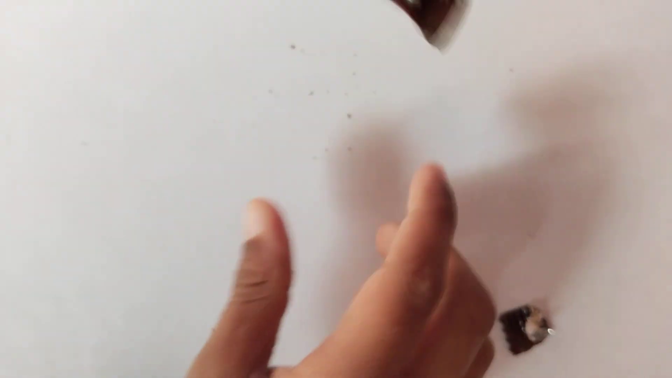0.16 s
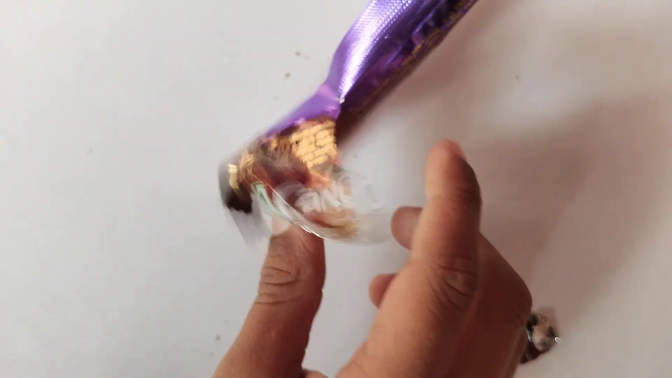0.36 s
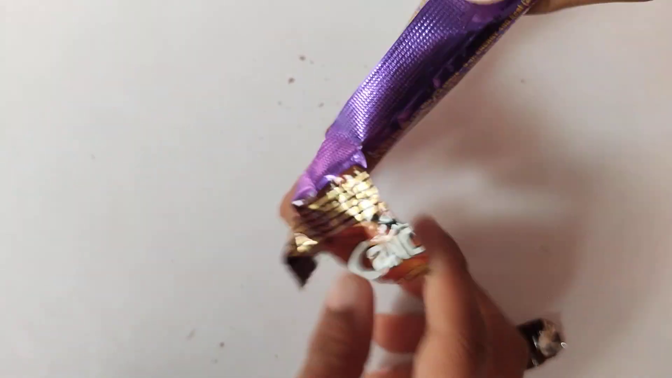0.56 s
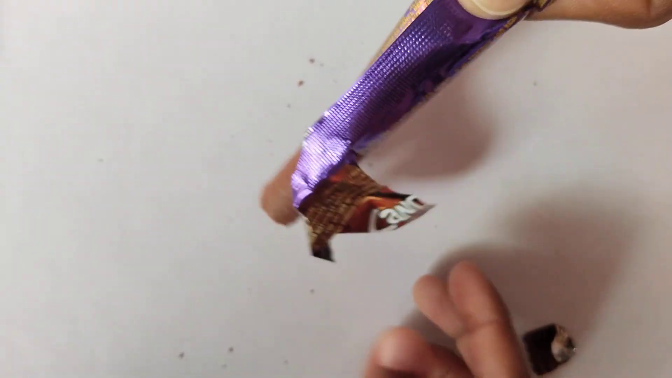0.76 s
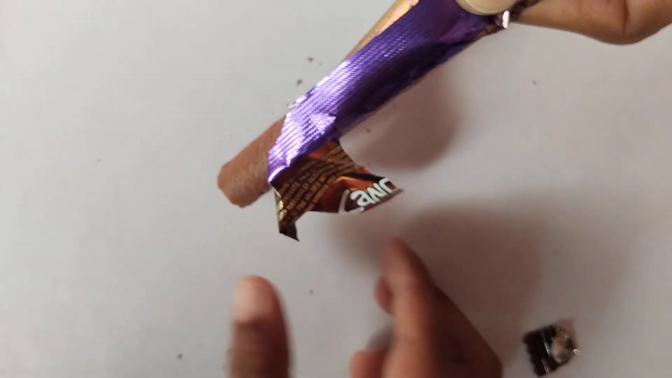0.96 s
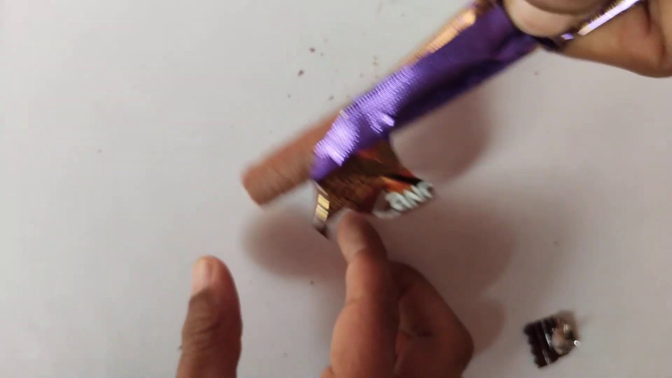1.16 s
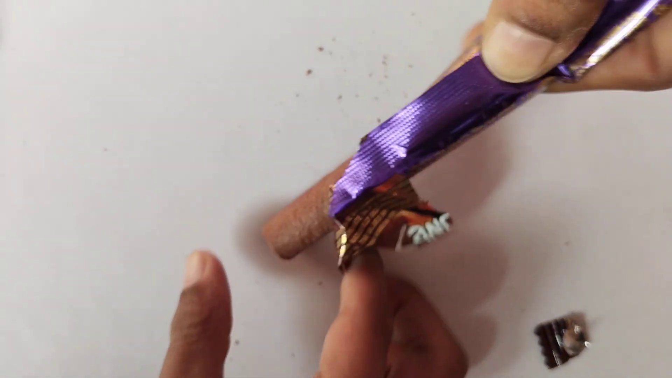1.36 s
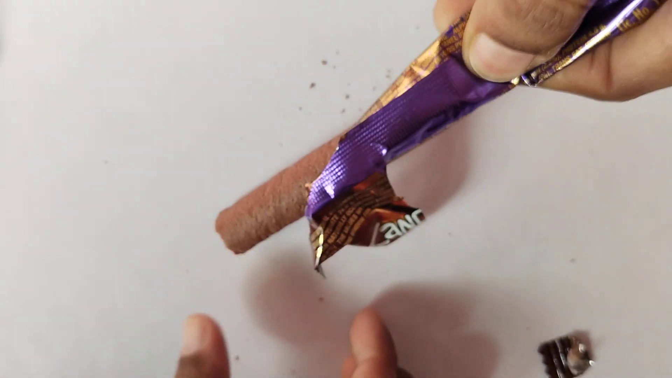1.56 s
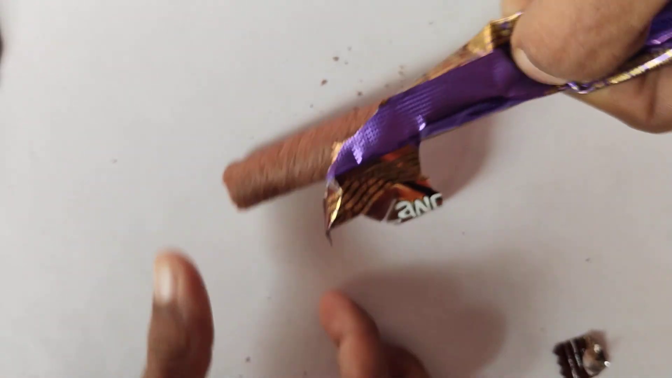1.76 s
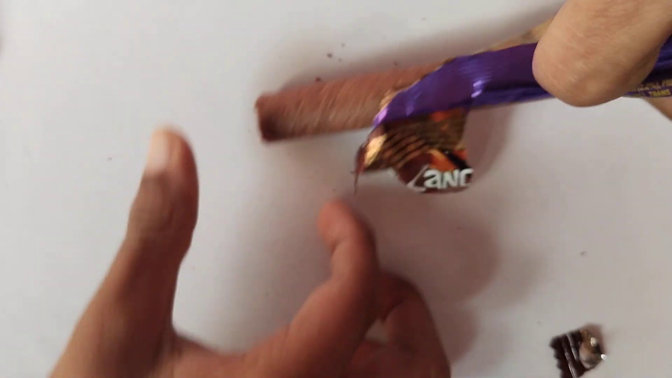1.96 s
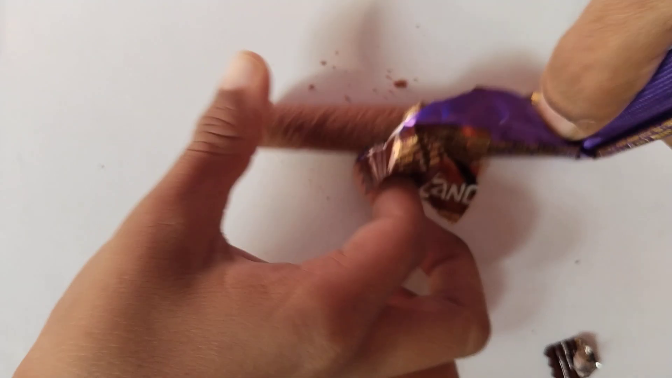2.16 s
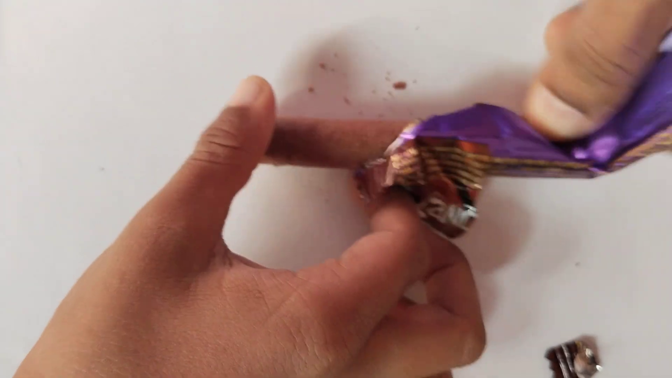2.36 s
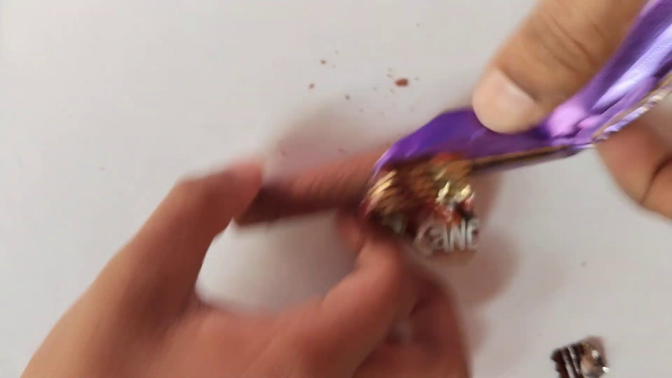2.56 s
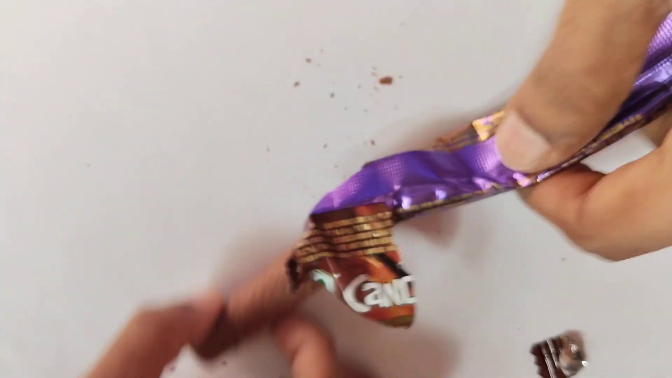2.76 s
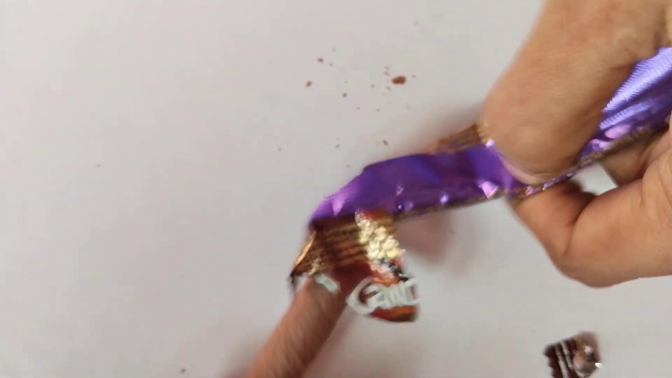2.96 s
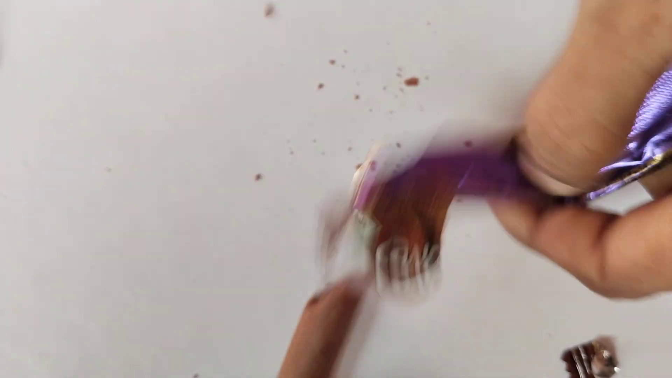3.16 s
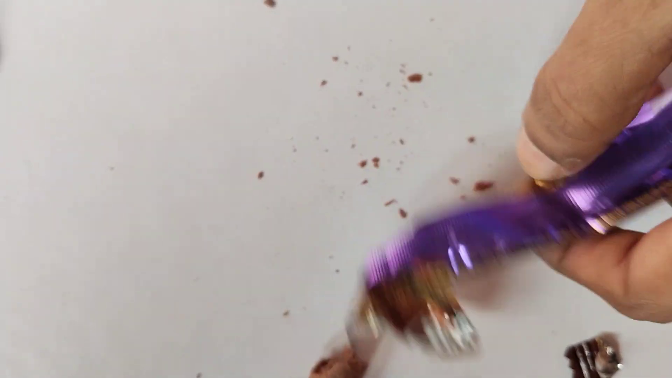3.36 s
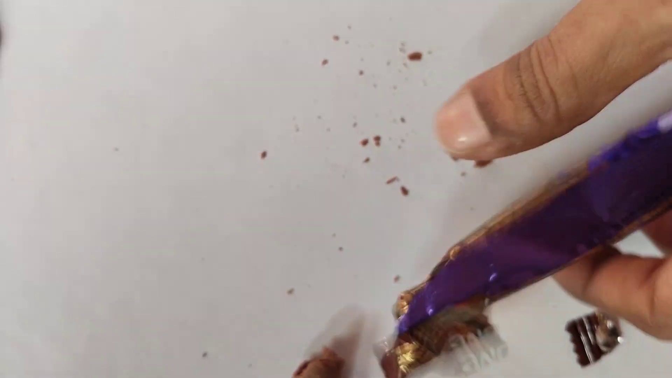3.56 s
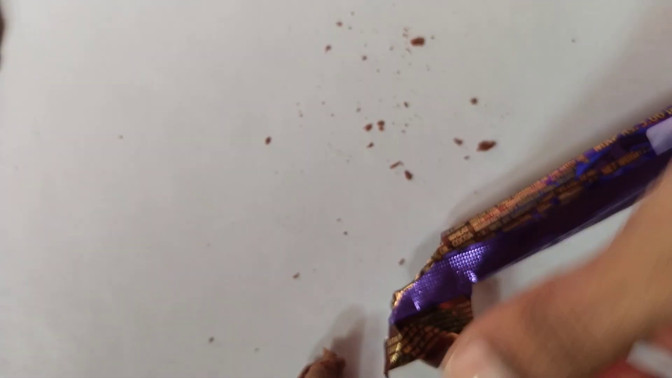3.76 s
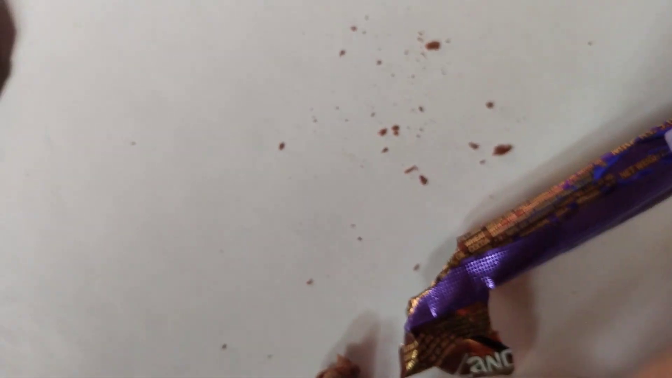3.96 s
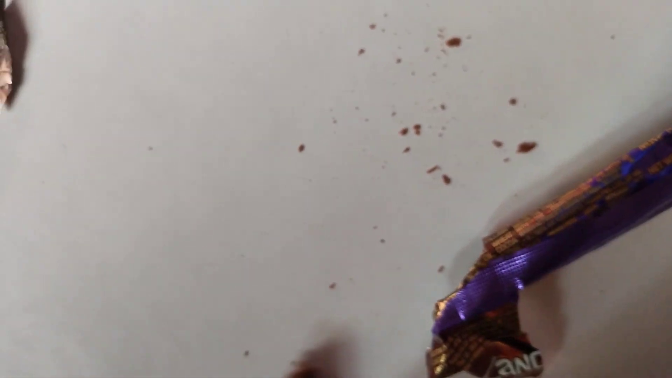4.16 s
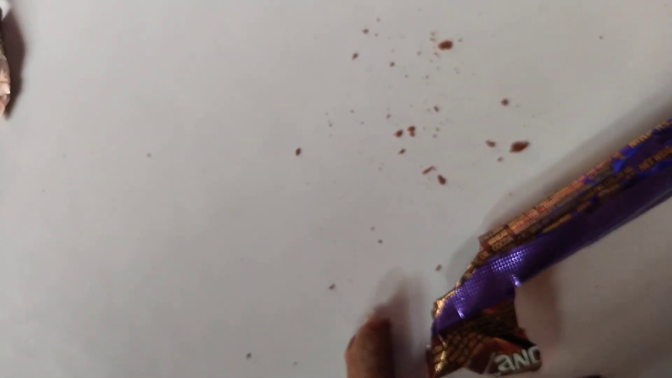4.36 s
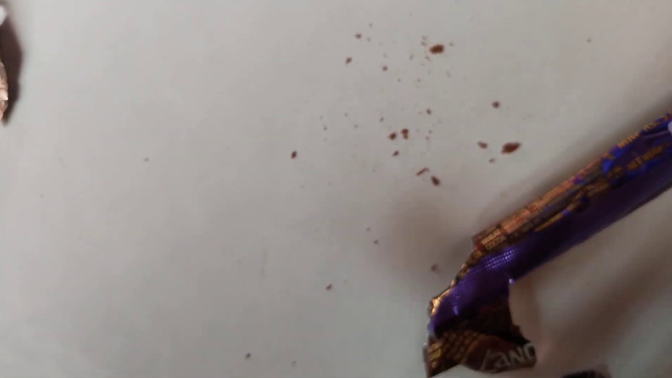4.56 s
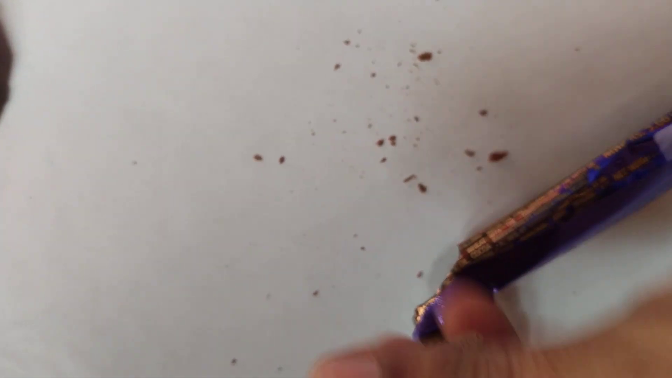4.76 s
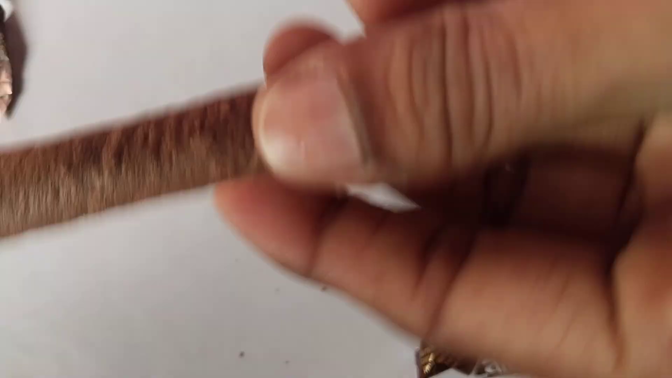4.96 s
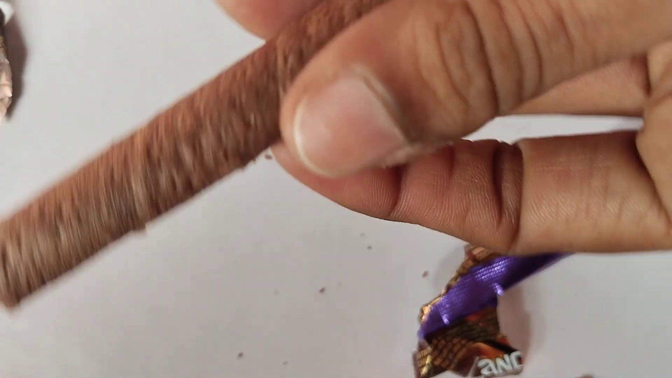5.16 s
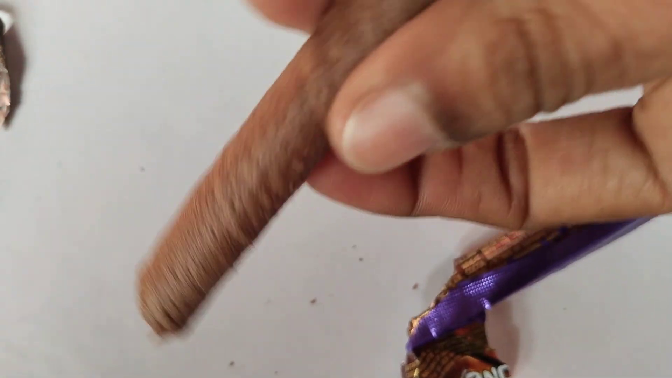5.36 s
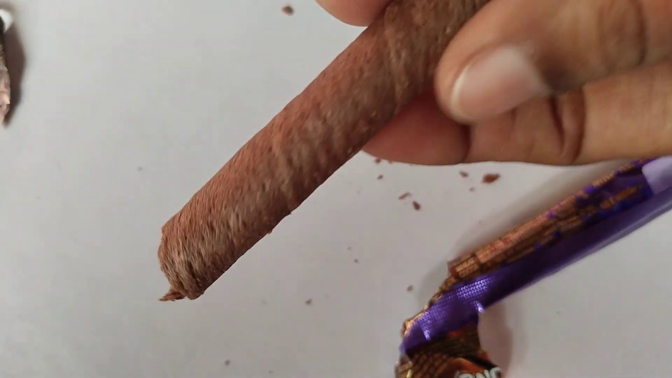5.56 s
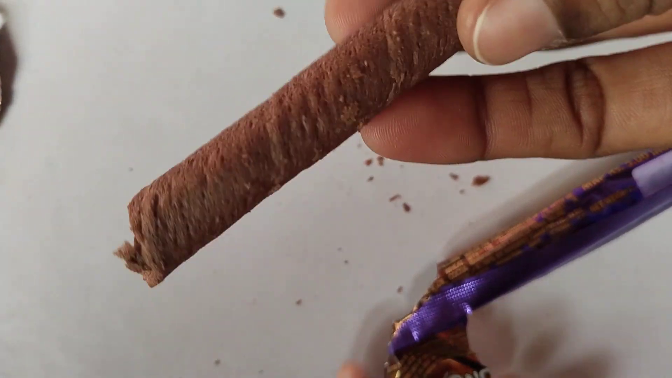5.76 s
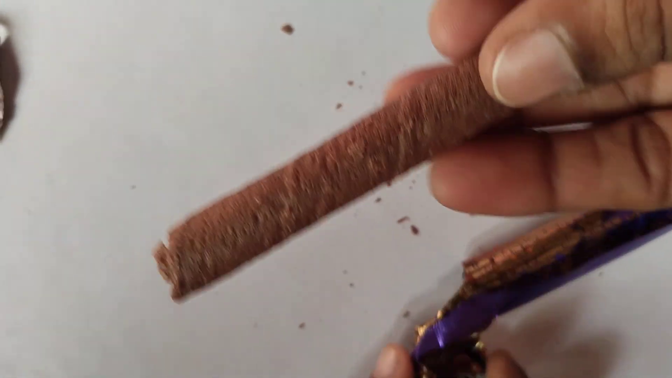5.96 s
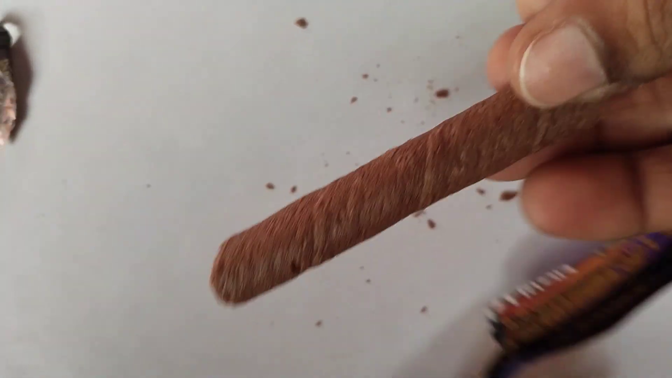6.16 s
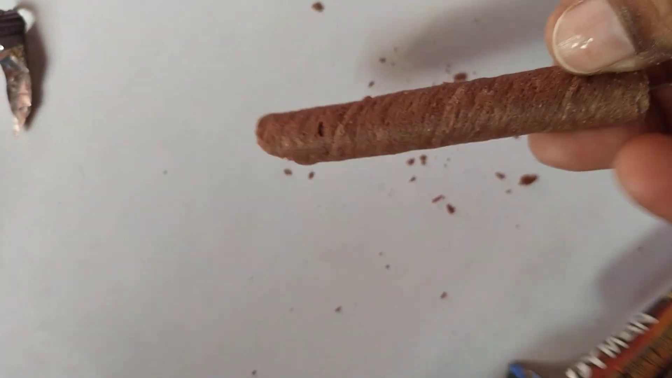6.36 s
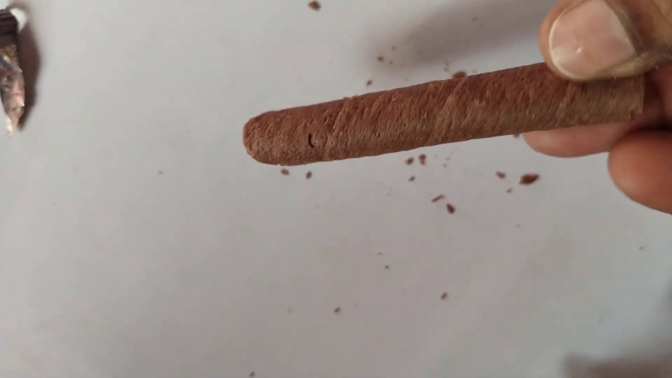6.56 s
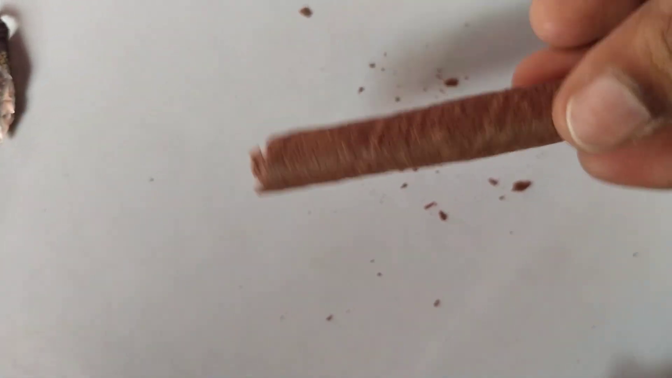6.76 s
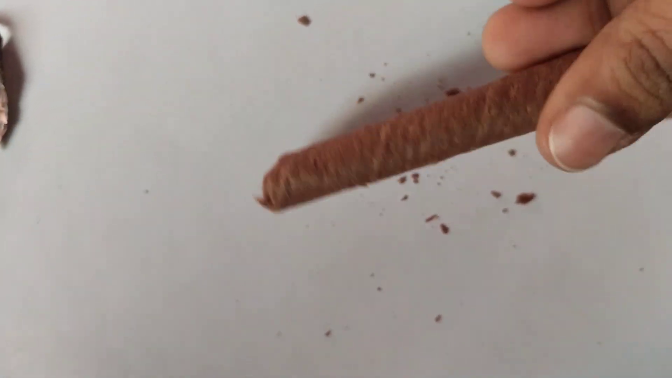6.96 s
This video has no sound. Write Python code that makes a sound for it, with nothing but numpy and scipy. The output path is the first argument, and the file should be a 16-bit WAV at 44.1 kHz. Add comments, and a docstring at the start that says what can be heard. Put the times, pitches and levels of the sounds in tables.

```python
"""Foil creases snap one by one over a rustle of tiny buckles as a wrapper is peeled off a wafer roll.
Each buckle is a short noise burst filtered by the foil; friction is noise shaped by hand gestures.
Knocks and rubbing excite decaying modes of the table top, and a small room answers, close to a phone.
After a pause with faint scuffs and squeaks the wrapper is pushed aside, with one last loud snap.
Outside, filtered noise rumbles as traffic, and two sine orders of a motor enter near the end."""
import sys
import numpy as np
from scipy import signal
from scipy.fft import rfft, irfft, next_fast_len
from scipy.io import wavfile

SR = 44100
rng = np.random.default_rng(int(sys.argv[2]) if len(sys.argv) > 2 else 0)


def put_to_file(sound):
    """Save the sound as 16-bit audio at rate SR, in the file named by the first command-line argument."""
    columns = np.atleast_2d(sound).T  # one column per channel
    safe = np.clip(columns, -1, 1)
    whole_steps = np.round(safe * 32767)
    wavfile.write(sys.argv[1], SR, whole_steps.astype(np.int16))


N = 312669
T = np.arange(N) / SR

# Levels in the tables are relative: later gains, random flicker, filters and the room act on them.

# traffic rumble over time: start_s, level_db; and its spectrum: frequency_hz, level_db
TRAFFIC_LEVEL = [(0, -63.5), (4.0, -60.5), (4.7, -54.5), (6.0, -56.5), (6.5, -59.5)]
TRAFFIC_SPECTRUM = [(20, -17.5), (45, 0.5), (70, 2.5), (95, -5), (140, -1.5), (350, -9), (520, -23),
                    (3000, -34.5), (5500, -45.5), (15500, -42)]
# lower order of the motor outside: start_s, pitch_hz, level_db
MOTOR_COURSE = [(6.45, 127.8, -78), (6.84, 129.2, -49.5), (7.0, 151.7, -56), (7.09, 160, -57.5)]

# faint hollow scuffs: start_s, length_s, level_db; their resonances: centre_hz, half_width_hz, level_db
SCUFF_MOVES = [(4.13, 0.39, -66.5), (4.285, 0.037, -54.5), (4.372, 0.019, -55), (4.45, 0.057, -60.5)]
SCUFF_RESONANCES = [(714, 79, -4), (1222, 70, -3), (1450, 90, -7)]
# faint high squeaks: start_s, length_s, level_db; their resonances: centre_hz, half_width_hz, level_db
SQUEAK_MOVES = [(3.93, 0.014, -58), (4.925, 0.029, -60.5), (6.927, 0.011, -52.5)]
SQUEAK_RESONANCES = [(3100, 220, 2), (3500, 650, -7)]
# faint, airy high rustles: start_s, length_s, level_db; their band: centre_hz, half_width_hz, level_db
AIRY_RUSTLES = [(4.38, 0.18, -66.5), (4.86, 0.11, -68), (5.315, 0.05, -72), (5.578, 0.015, -67),
                (6.69, 0.1, -75.5)]
AIRY_RUSTLE_BAND = [(10400, 4000, 0)]
# thin, slowly fading whistle: start_s, length_s, level_db; its pitch: centre_hz, half_width_hz, level_db
WHISTLE_MOVES = [(4.15, 0.27, -74.5)]
WHISTLE_RESONANCES = [(3353, 22, 0)]

# modes of the table top: frequency_hz, level_db, t60_s
TABLE_MODES = [(163, -15.5, 0.094), (345, -8, 0.096), (732.3, 6, 0.057), (1060, -7, 0.07), (1200, -2, 0.05),
               (1470, -4.5, 0.011), (2680, 1.5, 0.07)]
# hand landing on the table, and at 0.103 s a brief squeak that sets the board ringing: start_s, level_db,
# contact_ms (the push peaks after a quarter of it)
HAND_KNOCKS = [(0.103, -32.5, 0.56), (0.46, -13, 0.59), (1.381, -16.5, 7.6), (4.379, -25.5, 3.2),
               (4.393, -18.5, 5.9), (6.367, -19, 7.9)]
# strokes of hand and wafer over the table: start_s, length_s, level_db
TABLE_STROKES = [(0.016, 0.012, -45), (0.455, 0.005, -45), (0.848, 0.012, -56), (0.93, 0.012, -61),
                 (1.2, 0.12, -56.5), (1.49, 0.09, -55.5), (1.87, 0.12, -52.5), (2.08, 0.01, -43),
                 (2.185, 0.1, -42.5), (2.62, 0.19, -46), (2.91, 0.24, -46), (3.22, 0.099, -47),
                 (3.56, 0.18, -55.5), (4.45, 0.042, -56.5)]
# the resting hand shifts lightly while the wafer is drawn out: start_s, length_s, level_db
RESTING_HAND = (1.1, 2.6, -65)
# centre of the rubbing note, which dips and recovers: start_s, pitch_hz
RUBBING_PITCH = [(2.1, 745.4), (2.2, 702), (2.4, 732.5), (2.6, 707), (2.7, 656.6), (2.92, 737.4)]

# emptied wrapper pushed over the table: start_s, length_s, level_db
WRAPPER_PUSHES = [(3.655, 0.082, -42.5), (3.83, 0.02, -56), (5.935, 0.027, -47.5), (5.98, 0.058, -53.5),
                  (6.168, 0.0051, -51), (6.3, 0.12, -52)]
# resonances of the empty sleeve: centre_hz, width_hz, boost_db
SLEEVE_RESONANCES = [(2360, 750, 13), (3110, 240, 6.5), (3480, 180, 7.5), (4170, 360, 11.5), (7000, 540, 7)]
# fingers squeeze or pull the foil: start_s, length_s, level_db
FOIL_GRIPS = [(0.13, 0.044, -41), (0.175, 0.076, -38), (0.385, 0.089, -44.5), (0.55, 0.19, -51.5),
              (1.02, 0.31, -49), (1.225, 0.061, -38), (1.31, 0.078, -42.5), (1.9, 0.13, -50),
              (2.035, 0.066, -36.5), (2.17, 0.11, -38), (2.25, 0.06, -31), (2.6, 0.084, -50),
              (2.84, 0.056, -44), (2.9, 0.065, -32.5), (3.09, 0.018, -35.5), (3.655, 0.16, -57.5),
              (6.29, 0.064, -56.5)]
# the held wrapper stirs between grips: start_s, length_s, level_db
HELD_WRAPPER = (0, 3.76, -55)
# radiation spectrum of the foil: frequency_hz, level_db
FOIL_SPECTRUM = [(100, -26), (400, -21), (900, -9), (1800, -6), (2700, -2), (4200, 1.5), (5200, -1.5),
                 (6100, -5.5), (7200, -3.5), (9500, -1.5), (12500, -2.5), (15500, -6.5)]
# single snaps and ticks, loud and faint: start_s, peak_db, facet_ring_hz,
# body_db (below 2.6 kHz, relative to the peak), left_minus_right_db
CREASE_SNAPS = [(0.0034, -17, 9600, -30, 2), (0.0094, -15.5, 9850, -30, 2), (0.0366, -14.5, 8700, -13, -4),
                (0.1433, -19, 10400, -39.5, 7), (0.159, -18.5, 11450, -30, 4),
                (0.1803, -11, 4000, -32, 0.5), (0.2002, -16, 14220, -29, -8),
                (0.2352, -17, 3880, -13.5, -3), (0.255, -15.5, 11200, -30, 4.5),
                (0.263, -13.5, 14500, -28.5, 0), (0.351, -18.5, 3860, -14.5, 4),
                (0.439, -23, 10880, -19, 3.5), (0.4597, -10, 1304, -15, 0),
                (0.5782, -15.5, 11600, -61.5, -2), (0.6413, -22, 2530, -17.5, 4.5),
                (0.7006, -22, 10430, -23.5, 3), (0.8203, -20.5, 13100, -56, -1),
                (0.874, -20, 12500, -25, -1), (1.0394, -17, 11800, -27.5, -2),
                (1.082, -22.5, 11900, -37.5, 5.5), (1.149, -24, 2740, -13, 3.5),
                (1.2301, -12, 4272, -41.5, 8), (1.2448, -16, 9760, -36, 2),
                (1.26, -15.5, 9190, -42.5, -5.5), (1.3618, -13.5, 4270, -34, -2),
                (1.372, -16.5, 11720, -28, 3), (1.3814, -11, 11860, -23.5, 1),
                (1.5193, -15.5, 11200, -37.5, 3.5), (1.5273, -15.5, 9840, -33, 4),
                (1.5342, -21.5, 8840, -20.5, 0.5), (1.5563, -18, 9300, -47, 12),
                (1.5634, -17, 13000, -34, 2), (1.5669, -18, 13600, -25, 1.5),
                (1.7638, -23, 1290, -12, -2.5), (1.8975, -19, 9900, -28, 4), (1.9897, -20, 1493, -15.5, 5),
                (2.01, -18.5, 10000, -14, 3), (2.0733, -18.5, 9000, -30, 0.5),
                (2.0984, -10, 4400, -31.5, 6), (2.223, -19, 12850, -25.5, -3.5),
                (2.2515, -8.5, 4680, -21.5, -3), (2.2917, -16.5, 4940, -31, 3),
                (2.309, -12, 6880, -30.5, 2), (2.3176, -16.5, 4630, -29.5, 0), (2.3224, -14, 3445, -25, 0),
                (2.353, -17, 8720, -21, -2.5), (2.419, -14, 4220, -23, 4.5), (2.461, -17, 3460, -18, 1.5),
                (2.5082, -19.5, 9930, -24, 2), (2.5161, -10, 13000, -27.5, 5),
                (2.5675, -17.5, 7280, -30, 7.5), (2.7383, -19, 2600, -12.5, 4.5),
                (2.893, -20, 4200, -11, 5), (2.9042, -9.5, 3660, -23.5, 3.5), (2.974, -16, 5570, -46, 4),
                (3.0869, -11.5, 9100, -28.5, 2.5), (3.0984, -7.5, 4330, -27, 1.5),
                (3.13, -20, 4395, -19, -5), (3.181, -19.5, 4160, -20.5, -7),
                (3.2615, -20.5, 5550, -16.5, -6), (3.3545, -18.5, 10900, -21, 3),
                (3.4526, -16.5, 3975, -15.5, 3), (3.657, -13.5, 3700, -23, 0), (3.7337, -18, 3430, -26, 2),
                (4.3, -37, 3930, -2, 0), (5.853, -49.5, 1100, -5, 10), (6.003, -32.5, 3930, -17, 3),
                (6.3654, -12.5, 7000, -24, 2)]

# time constants in s of the gesture envelopes; gripped foil gives at once and settles more slowly
GRIP_ATTACK_S, GRIP_RELEASE_S = 0.0051, 0.035
STROKE_ATTACK_S, STROKE_RELEASE_S = 0.012, 0.025
PUSH_ATTACK_S, PUSH_RELEASE_S = 0.0091, 0.024
# the crackle comes in bunches: spread in dB, random levels per second
BUNCH_DB, BUNCHES_PER_S = 3, 90
LEAD_S = 0.006  # room for a facet to stir before it flips
ROOM_T60_S, ROOM_TREBLE_T60_S, ROOM_BUILD_S = 0.4, 0.27, 0.0055
TOP_HZ = 15900  # upper limit of the phone


def undb(db):
    """Convert a level in decibels to an amplitude ratio."""
    return 10 ** (np.asarray(db) / 20)


def curve(rows, column=1):
    """Interpolate a table column linearly in time."""
    rows = np.array(rows)
    return np.interp(T, rows[:, 0], rows[:, column])


def unit(x):
    """Normalize to a root-mean-square value of 1."""
    return x / np.sqrt(np.mean(x ** 2))


def panned(db):
    """Power-preserving left and right gains for a level difference in dB."""
    return unit(undb(np.array([[db], [-db]]) / 2))


def colour(points, hz):
    """Interpolate a spectrum in dB on a logarithmic frequency axis."""
    f, db = np.transpose(points)
    return np.interp(np.log(hz + 1), np.log(f), db)


def shaped(x, db_at):
    """Linear filtering: multiply the spectrum by a gain in dB given as a function of frequency."""
    size = next_fast_len(x.shape[-1])
    gain = undb(db_at(np.fft.rfftfreq(size, 1 / SR)))
    return irfft(rfft(x, size) * gain, size)[..., :x.shape[-1]]


def causal(db):
    """Minimum phase: fold the cepstrum of a dB spectrum (last axis) so that it rings only after the blow."""
    cepstrum = irfft(db * np.log(10) / 20)
    half = cepstrum.shape[-1] // 2
    cepstrum[..., 1:half] *= 2
    cepstrum[..., half + 1:] = 0
    return np.exp(rfft(cepstrum))


def walk(rate):
    """Slow random fluctuation: Gaussian values at the given rate in Hz, joined by lines, spread near 1."""
    knots = rng.standard_normal(int(N / SR * rate) + 2)
    return 1.28 * np.interp(T * rate, np.arange(len(knots)), knots)


def add(out, s, sound):
    """Superposition: mix a sound in from time s, in seconds."""
    start = int(s * SR)
    a, b = max(start, 0), min(start + sound.shape[-1], N)
    if b > a:
        out[..., a:b] += sound[..., a - start:b - start]


def gestures(rows, attack_s, release_s):
    """Exponential envelope: each move swells, holds and dies away; the strongest one leads."""
    gain = np.full(N, 1e-6)
    for start, length, db in rows:
        before = np.maximum(start - T, 0) / attack_s
        after = np.maximum(T - start - length, 0) / release_s
        gain = np.maximum(gain, undb(db) * np.exp(-np.minimum(before + after, 20)))
    return gain


def outside(upper_ratio=1.175, upper_db=-2, side_db=-7):
    """Filtered noise and beating: traffic rumbles through the walls; two close motor orders beat."""
    mid, side = rng.standard_normal((2, N))
    # the two channels are more alike in the bass
    side = shaped(side, lambda hz: side_db / (1 + (hz / 500) ** 2))
    channels = np.array([mid + side, mid - side])
    rumble = unit(shaped(channels, lambda hz: colour(TRAFFIC_SPECTRUM, hz)))
    phase = 2 * np.pi * np.cumsum(curve(MOTOR_COURSE)) / SR
    orders = np.sin(phase) + undb(upper_db) * np.sin(upper_ratio * phase)
    motor = orders * (T > MOTOR_COURSE[0][0])
    flicker_db = 1.2 * walk(12)
    return rumble * undb(curve(TRAFFIC_LEVEL) + flicker_db) + motor * undb(curve(MOTOR_COURSE, 2))


def room(x, early_db, tail_db):
    """Reverberation: near surfaces answer around 7 ms; a short tail builds up and loses its treble first."""
    t = T[:SR // 2]
    early = rng.standard_normal((2, len(t))) * np.exp(-((t - .007) / 0.0042) ** 2)
    wash = rng.standard_normal((2, len(t))) * (1 - np.exp(-(t / ROOM_BUILD_S) ** 2))
    low = shaped(wash, lambda hz: -20 * np.log10(1 + (hz / 5000) ** 2))
    treble = wash - low
    tail = low * undb(-60 * t / ROOM_T60_S) + treble * undb(-60 * t / ROOM_TREBLE_T60_S)
    response = (undb(early_db) * unit(early) + undb(tail_db) * unit(tail)) / np.sqrt(len(t))
    return signal.oaconvolve(x, response, axes=1)[:, :N]


def ringing(moves, resonances, attack_s=0.0063, release_s=0.011, rough_db=3):
    """Resonance: a rough noise sings in a few bands, with a quick start and a trailing end."""
    def timbre(hz):
        power = sum(undb(db) ** 2 / (1 + ((hz - centre) / width) ** 2) ** 2
                    for centre, width, db in resonances)
        return 10 * np.log10(power)
    hiss = rng.standard_normal((2, N)) * undb(rough_db * walk(220))
    return unit(shaped(hiss, timbre)) * gestures(moves, attack_s, release_s)


def table_top(force):
    """Modal superposition: a force rings the board, whose deep bass hardly radiates."""
    t = T[:SR // 2]
    ring = np.zeros((2, len(t)))
    for hz, db, t60 in TABLE_MODES:
        side = panned(-5 if hz < 900 else 2)  # low modes are stronger at the right
        ring += side * undb(db - 60 * t / t60) * np.cos(2 * np.pi * hz * t)
    radiation = signal.butter(2, 110, "high", fs=SR, output="sos")
    return signal.sosfilt(radiation, signal.oaconvolve(force[None], ring)[:, :N])


def knocks(scrape_db=-23, scrape_s=0.011):
    """Impact: a longer, softer push wakes only the low modes; the fingers scrape a little as they land."""
    force, t = np.zeros(N), T[:SR // 5]
    for s, db, contact_ms in HAND_KNOCKS:
        push = t * np.exp(-4000 * t / contact_ms)
        scrape = rng.standard_normal(len(t)) * np.exp(-t / scrape_s) * (1 - np.exp(-t / 0.011))
        contact = undb(scrape_db) * scrape
        contact[0] = 1  # the blow itself
        add(force, s, undb(db) * signal.fftconvolve(contact, push / push.sum()))
    return table_top(force)


def rubbing(board_db=-2, soft_hz=1200):
    """Stick-slip: skin slips in uneven spurts, a breathy low squeak with random slips waking the board."""
    slips = (rng.random(N) < 900 / SR) * rng.standard_normal(N)
    board = table_top(shaped(slips, lambda hz: -10 * np.log10(1 + (hz / soft_hz) ** 4)))
    # slow noise on two carriers makes the note breathy
    a, b = shaped(rng.standard_normal((2, N)), lambda hz: -10 * np.log10(1 + (hz / 20) ** 3))
    note = curve(RUBBING_PITCH) * (1 + .022 * walk(45))  # slip rate flutters around its note
    phase = 2 * np.pi * np.cumsum(note) / SR
    squeak = unit(a * np.cos(phase) + b * np.sin(phase)) * panned(1.49)
    pressure = gestures(TABLE_STROKES + [RESTING_HAND], STROKE_ATTACK_S, STROKE_RELEASE_S)
    spurts = undb(3.2 * walk(30))
    return (squeak + undb(board_db) * unit(board)) * pressure * spurts


def off_centre(x, lag_rad=1.25, corner_hz=260):
    """Phase lag: board sound reaches the left a fraction of a cycle late; deep bass arrives together."""
    hz = np.fft.rfftfreq(N, 1 / SR)
    late = np.exp(-1j * lag_rad * np.tanh(hz / corner_hz))
    return np.array([irfft(rfft(x[0]) * late, N), x[1]])


def pushing(gain_db=0, grain_db=4.5, body_db=0):
    """Friction into a resonator: the empty sleeve skids on the table with a smooth, hollow scrape."""
    def timbre(hz):
        hollow = sum(db / (1 + (2 * (hz - centre) / width) ** 2) for centre, width, db in SLEEVE_RESONANCES)
        return colour(FOIL_SPECTRUM, hz) + hollow + body_db / (1 + (hz / 1500) ** 4)
    friction = rng.standard_normal((2, N)) * undb(grain_db * walk(300))
    moves = gestures(WRAPPER_PUSHES, PUSH_ATTACK_S, PUSH_RELEASE_S)
    return unit(shaped(friction, timbre)) * moves * undb(gain_db)


def sliding(effort, gain_db=-4, sleeve_hz=3300, sleeve_db=4):
    """Sliding friction: foil on wafer gives a fine, grainy hiss, coloured by the hollow sleeve."""
    def timbre(hz):
        sleeve = sleeve_db / (1 + ((hz - sleeve_hz) / 900) ** 2)
        return colour(FOIL_SPECTRUM, hz) + sleeve - 7 / (1 + (hz / 1500) ** 4)
    friction = rng.standard_normal((2, N)) * undb(6 * walk(900))
    return unit(shaped(friction, timbre)) * effort * undb(gain_db)


def buckle(out_db, ring_hz, body_db, pan_db, lag_s, rise_s, fall_s, flutter_db, ring_db, size=1024):
    """Buckling: a facet stirs, gives way in a sharp burst and flutters briefly."""
    t, hz = T[:size] - LEAD_S, np.fft.rfftfreq(size, 1 / SR)
    flutter = np.exp(np.minimum(t / .002, -t / .0035))
    burst = np.exp(np.minimum(t / rise_s, -t / fall_s)) + undb(flutter_db) * flutter
    # the facet beams differently to each channel, so only part of the burst is shared
    shared = rng.standard_normal(size)
    channels = burst * (shared + 0.82 * rng.standard_normal((2, size)))
    ring = ring_db / (1 + (np.log((hz + 1) / ring_hz) / 0.14) ** 2)
    body = body_db / (1 + (hz / 2600) ** 4)
    channels = irfft(rfft(channels) * causal(colour(FOIL_SPECTRUM, hz) + ring + body))
    late = int(lag_s < 0)  # positive lag delays the left
    channels[late] = np.roll(channels[late], int(abs(lag_s) * SR))
    energy = np.sum(channels ** 2, axis=1, keepdims=True) / (SR / 1000)  # power over 1 ms
    return channels / np.sqrt(energy) * undb(out_db) * panned(pan_db)


def rustle(effort, spread_db=8, gain_db=1.5, ring_db=5, body_db=-3, count=3600):
    """Random superposition: countless tiny buckles of many pitches, louder with the fingers' effort."""
    out, effort_db = np.zeros((2, N)), 20 * np.log10(effort)
    draws = np.c_[rng.random(count), rng.standard_normal((count, 5))]
    for when, size, pitch, body, side, lag in draws:
        db = effort_db[int(when * N)] + gain_db + spread_db * min(size, 1.3)
        hz = 2500 * 6 ** ((1 + np.tanh(pitch)) / 2)  # 2.5 to 15 kHz
        pan_db, lag_s = 1 + 3 * side, .0002 + 0.00024 * lag
        tick = buckle(db, hz, body_db + 3 * body, pan_db, lag_s, .0002, .0003, -28, ring_db)
        add(out, when * N / SR - LEAD_S, tick)
    return out


def snaps(body_db=24, ring_db=7, flutter_db=-21, crest_db=3, rise_s=0.00055, fall_s=0.00099,
          onset_s=.0011, pop_db=1, pop_s=0.00034):
    """Snap-through: a crease cracks, and the flipping sheet pushes aside a low pop of air."""
    out, t = np.zeros((2, N)), T[:SR // 100] / pop_s
    pop = (1 - t) * np.exp(-t)
    for s, db, hz, body, pan in CREASE_SNAPS:
        lag_s = rng.normal(.00027, .0001)
        crack = buckle(db - crest_db, hz, body + body_db, pan, lag_s, rise_s, fall_s, flutter_db, ring_db)
        add(out, s + onset_s - LEAD_S, crack)
        add(out, s + onset_s, undb(db + body + pop_db) * pop)
    return out


def sheet(x, depth_db=3.0, spacing_hz=150, size=8192):
    """Modal filtering: the crumpled sheet has many narrow resonances, drawn anew for each short frame."""
    hz, _, frames = signal.stft(x, SR, nperseg=size)
    knots = np.arange(0, SR / 2, spacing_hz)
    draws = rng.standard_normal((frames.shape[-1], len(hz)))
    ripple_db = depth_db * np.array([np.interp(hz, knots, row[:len(knots)]) for row in draws])
    ripple = causal(ripple_db).T / np.sqrt(np.mean(undb(ripple_db) ** 2))
    return signal.istft(frames * ripple, nperseg=size)[1][:, :N]


def scene():
    """Superposition of direct sound, room echoes and the sounds from outside."""
    bunches = undb(BUNCH_DB * walk(BUNCHES_PER_S))
    # the foil slides only under a grip; merely held, it ticks
    pull = gestures(FOIL_GRIPS, GRIP_ATTACK_S, GRIP_RELEASE_S) * bunches
    stir = gestures(FOIL_GRIPS + [HELD_WRAPPER], GRIP_ATTACK_S, GRIP_RELEASE_S) * bunches
    foil = sheet(snaps() + rustle(stir) + sliding(pull) + pushing())
    board = off_centre(knocks() + rubbing())
    faint = ringing(SCUFF_MOVES, SCUFF_RESONANCES) + ringing(SQUEAK_MOVES, SQUEAK_RESONANCES)
    faint += ringing(AIRY_RUSTLES, AIRY_RUSTLE_BAND, rough_db=2.5)
    faint += ringing(WHISTLE_MOVES, WHISTLE_RESONANCES, attack_s=.03, release_s=0.35, rough_db=0.5)
    # the board's main mode is strong only close to it and carries poorly into the room
    carried = shaped(board, lambda hz: -9 / (1 + ((hz - 732) / 130) ** 2))
    foil_echoes = room(foil, early_db=-15, tail_db=-12.5)
    other_echoes = room(carried + faint, early_db=-11.5, tail_db=-7.5)
    return foil + board + faint + foil_echoes + other_echoes + outside()


def record(dry):
    """Band limiting: the phone cuts the top with a steep low-pass filter."""
    return signal.sosfilt(signal.ellip(8, .2, 70, TOP_HZ, fs=SR, output="sos"), dry)


dry = scene()
out = record(dry)
put_to_file(out)
```